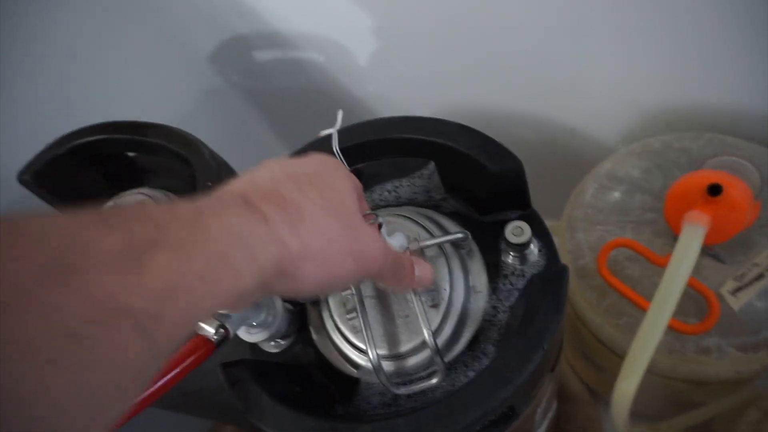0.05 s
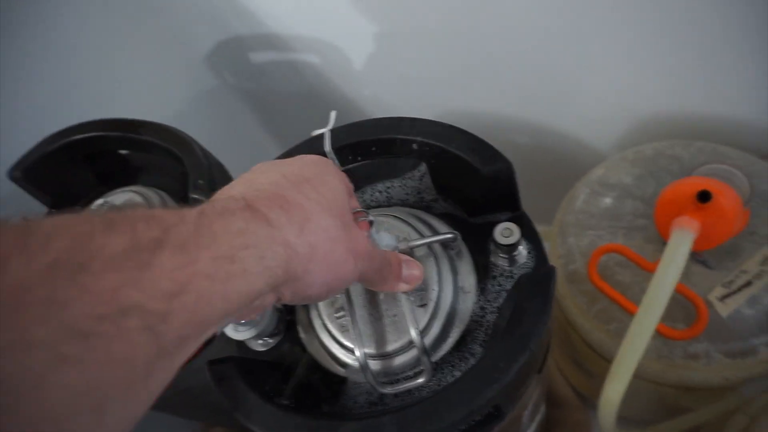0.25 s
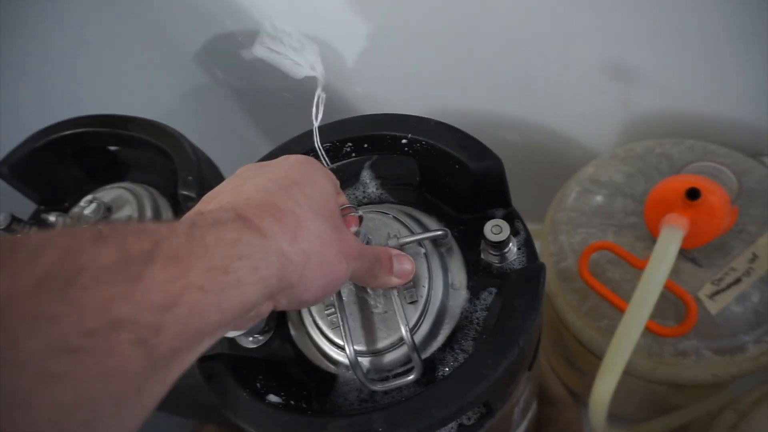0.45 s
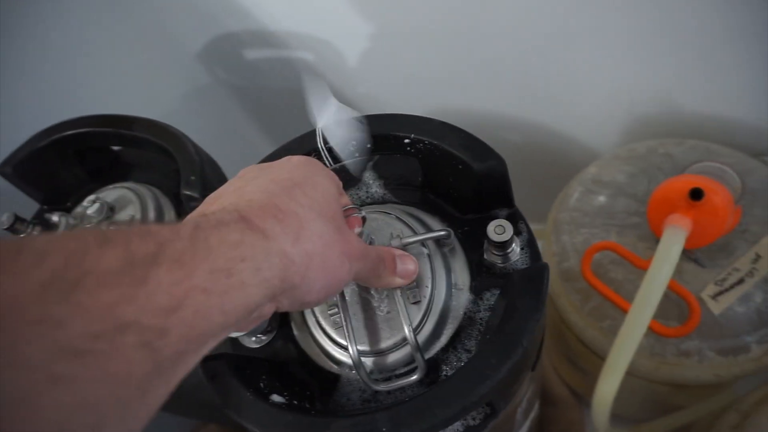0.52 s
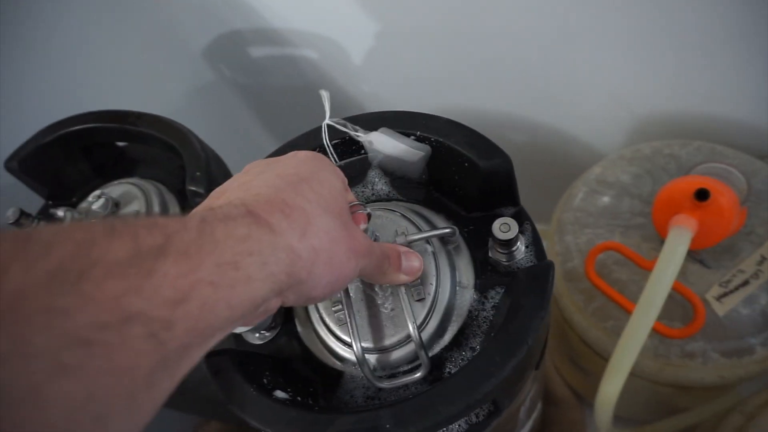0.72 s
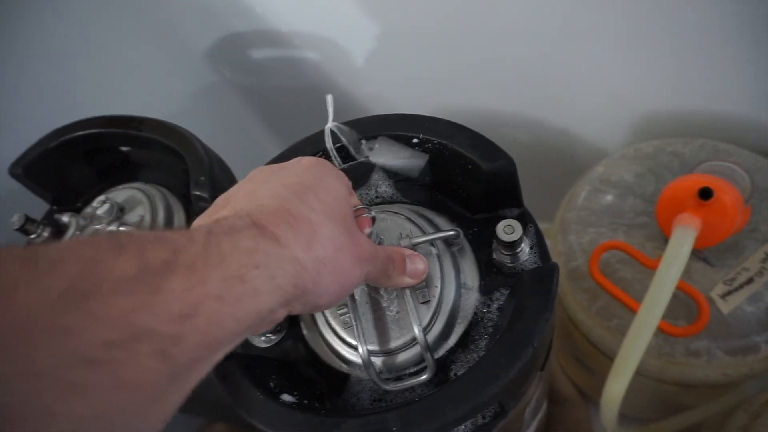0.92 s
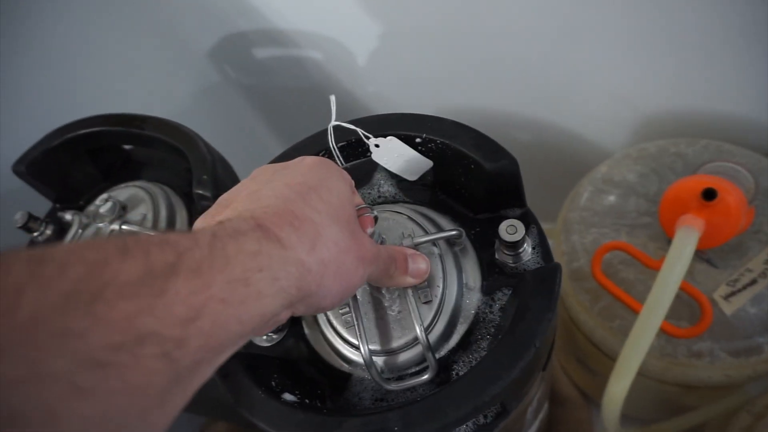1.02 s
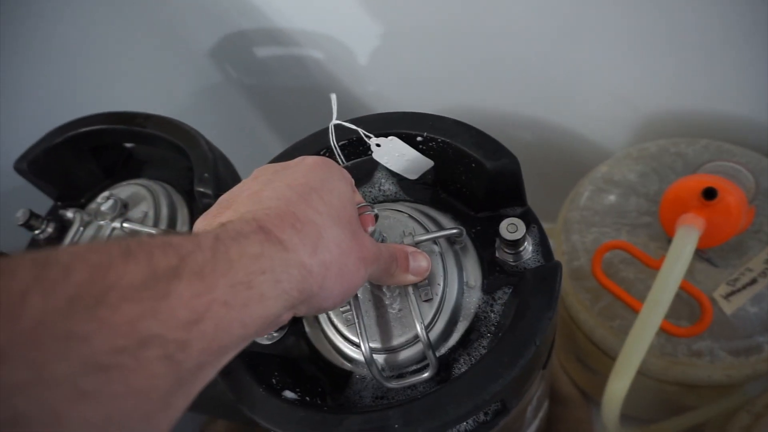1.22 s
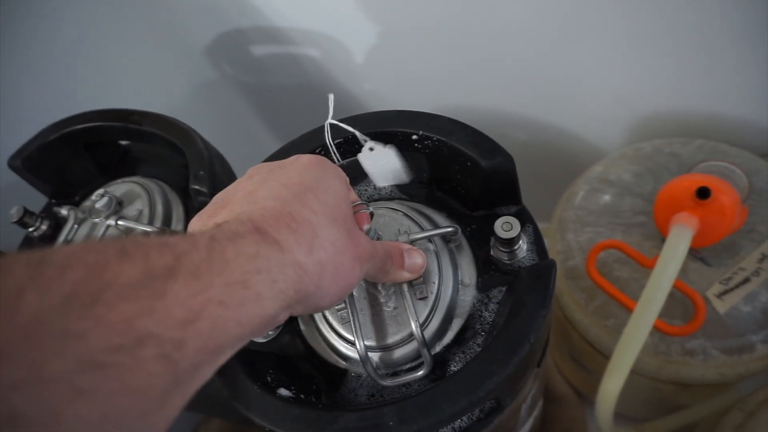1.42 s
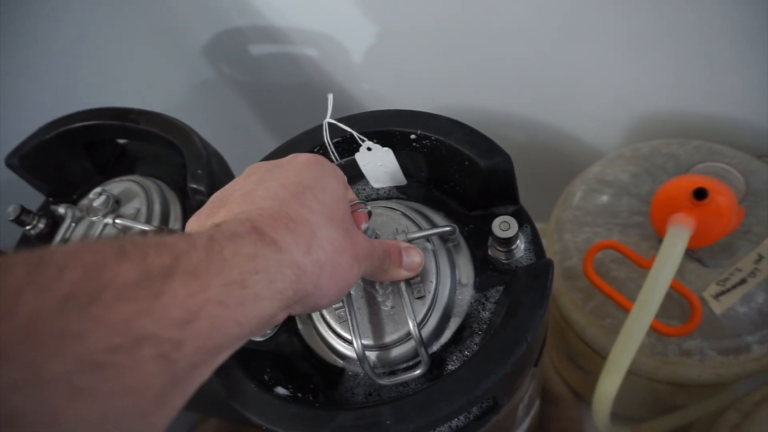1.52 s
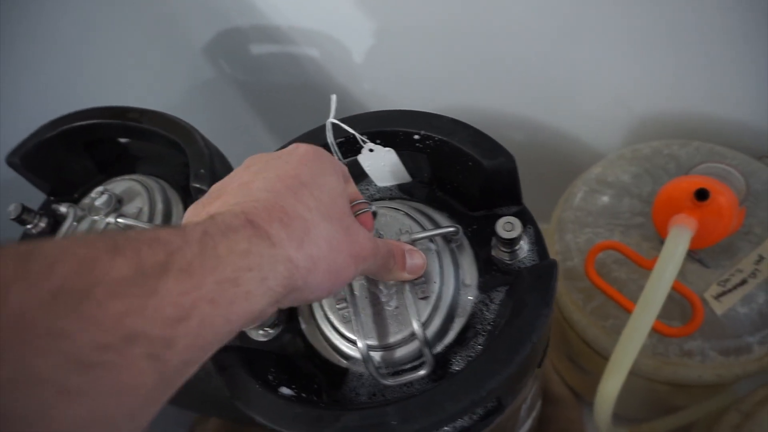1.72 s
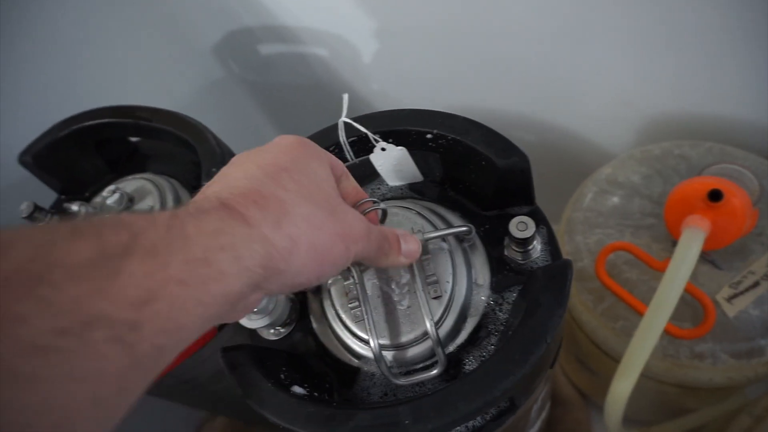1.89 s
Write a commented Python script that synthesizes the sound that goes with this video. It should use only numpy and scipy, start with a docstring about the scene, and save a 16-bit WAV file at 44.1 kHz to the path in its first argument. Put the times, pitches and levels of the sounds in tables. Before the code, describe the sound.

Gas hisses loudly from a steel keg's valve, which snaps shut with a hollow knock.

```python
"""The relief valve on a steel keg's lid is pulled open, close up in a small room.
It ticks, and gas spits as the seal breaks. A thin hiss fills out and grows to a roar as the
valve lifts, ringing in the hollow of the keg's rim. The valve snaps back with a hollow knock
that rings the keg. A weak leak hisses on, and over it the slack pull ring scrapes and clinks."""
import sys
import numpy as np
from scipy import signal
from scipy.fft import rfft, irfft, next_fast_len
from scipy.io import wavfile
from scipy.ndimage import map_coordinates

SR = 44100
rng = np.random.default_rng(int(sys.argv[2]) if len(sys.argv) > 2 else 0)


def dump_mix(stems):
    """Bounce the given channels to the path in sys.argv[1] as a 16-bit WAV at rate SR."""
    frames = np.atleast_2d(stems).T  # one column per channel
    limited = np.clip(frames, -1, 1)  # hard clip at full scale
    pcm = np.round(limited * 32767).astype(np.int16)
    wavfile.write(sys.argv[1], SR, pcm)


N = 85995

# Stereo width of the noise: f/Hz, left-right correlation
CORRELATION = [(60, 1), (300, 0.91), (700, 0.79), (1100, 0.78), (2000, 0.53), (2700, 0.18), (4000, 0.65),
               (5500, 0.3), (7000, 0.44), (8800, 0.057), (9600, 0.57), (11000, 0.47)]
# Stereo lean of the noise: f/Hz, left minus right/dB
BALANCE = [(300, 1.5), (680, -0.5), (1020, 0), (1530, -5), (2000, 0.5), (2700, -4.5), (3350, -5),
           (3900, -3), (4400, 2.5), (5200, 0.5), (6200, 0), (7500, 1), (8500, -0.5), (9400, -3.5),
           (10600, 2)]
# Colour of the room tone: f/Hz, level/dB
ROOM_TONE_EQ = [(25, -36), (58, -15), (131, -17), (208, -1.5), (254, -21), (300, -8.5), (391, -15),
                (550, -12.5), (800, -19), (3000, -27), (11000, -33.5)]
# Decay of the room's tail: f/Hz, T60/s
ROOM_DECAY = [(100, 0.2), (700, 0.61), (3000, 0.58), (6000, 0.24), (11000, 0.3)]

# Fade of the leak: t/s, level/dB
LEAK_FADE = [(1.61, -39.5), (1.72, -44.5), (1.78, -45), (1.83, -47), (1.88, -46.5), (1.92, -47),
             (1.95, -48)]
# Colour of the leak: f/Hz, level/dB
LEAK_EQ = [(100, -29), (300, -23), (450, -32), (700, -13.5), (1000, -19), (1500, -14), (2500, -15),
           (4200, -14), (4900, -19), (6000, -11.5), (7300, -19), (8200, -14.5), (9200, -17), (10200, -10.5),
           (11000, -18.5)]
# Resonances the leak excites: f/Hz, width/Hz, level/dB, left minus right/dB
LEAK_PEAKS = [(672, 33, 1.5, 3), (1002, 105, 3, 2), (2540, 140, -2.5, -9), (8130, 140, -5, 2),
              (10600, 200, -9.5, -17)]
# Resonances of the sliding pull ring: f/Hz, width/Hz, level/dB, left minus right/dB
SCRAPE_PEAKS = [(1330, 150, -9, -2), (2030, 410, -5, -3), (2848, 130, -2, -4), (3160, 200, -9, 8)]
# Modes of the pull ring touching the lid: f/Hz, level/dB, T60/s
CLINK_MODES = [(1770, -4, 0.063), (2520, -2.5, 0.21), (3060, -6, 0.2)]

# Spits as the seal breaks: t/s, length/s, level/dB, T60/s
SEAL_SPITS = [(0.2249, 0.026, -22.5, 0.28), (0.27, 0.011, -27, 0.19)]
# Colour of gas through the barely open seat: f/Hz, level/dB
SPIT_EQ = [(300, -32), (900, -18), (1400, -6.5), (2000, -25), (2450, -1), (3300, 2.5), (4100, -0.5),
           (4500, -9), (5200, -3.5), (7000, -4), (11000, -41)]

# Hits of the valve: t/s, thump/dB, knock/dB, ring/dB, click/dB
VALVE_HITS = [(0.1935, -47.5, -52, -78, -88), (0.2175, -62, -62, -75, -44), (0.2255, -51, -51, -74, -22.5),
              (1.6038, -12.5, -21, -34, -20.5), (1.6091, -27, -28, -43, -18), (1.618, -40, -30.5, -54, -29)]
# Colour of the dull knock: f/Hz, level/dB
KNOCK_EQ = [(30, -34), (55, -22), (75, -8), (130, -33), (220, -10.5), (290, -35), (400, -9.5), (540, -0.5),
            (740, 4.5), (900, -7), (1250, -6), (1600, -17), (3000, -21), (9000, -52)]
# Colour of the bright click: f/Hz, level/dB
CLICK_EQ = [(400, -14.5), (1200, 3.5), (1600, -2.5), (2100, 6.5), (2700, 1), (3500, 6), (4400, -4),
            (5300, -2), (7000, -18), (11000, -3.5)]
# Modes of the steel keg: f/Hz, level/dB, T60/s
KEG_MODES = [(80, -17.5, 0.39), (336, -4, 0.11), (652, -7, 0.26), (990, 0, 0.33), (2147, -3, 0.24),
             (2410, 3, 0.045), (3485, 9.5, 0.07), (5170, -1, 0.1)]
# Rough booms of the keg's hollow after the valve shuts: t/s, level/dB
BOOM_HITS = [(1.606, -32.5), (1.676, -43)]
# Resonances of that boom: f/Hz, width/Hz, level/dB, left minus right/dB
BOOM_PEAKS = [(600, 91, -1, 0), (650, 45, 0, -1), (820, 100, -4, 3), (930, 110, -6, -2)]

# Valve lift as a fader ride, taken relative to its mean: t/s, level/dB
LIFT_RIDE = [(0.23, -32.5), (0.33, -33), (0.46, -29.5), (0.6, -26.5), (0.72, -25.5), (0.8, -23.5),
             (0.89, -22), (0.998, -22.5), (1.1, -22.5), (1.17, -23.5), (1.28, -22), (1.34, -23.5),
             (1.43, -22.5), (1.48, -24.5), (1.56, -22), (1.6, -22)]
# Colour of the jet's fine fizz: f/Hz, level/dB
FIZZ_EQ = [(50, -43), (530, -27), (900, -44), (1250, -36), (1410, -12.5), (1720, -13.5), (1950, -10),
           (3160, -8), (4020, -3.5), (4610, -12.5), (5750, -3), (8740, -4.5), (10200, 2), (11000, -0.5),
           (14300, -60), (22000, -120)]
# Colour of the jet's bright roar: f/Hz, level/dB
ROAR_EQ = [(60, -52), (350, -25), (1000, -26), (2000, -8), (2800, -15), (3400, -5), (3800, -1),
           (4600, -1.5), (5100, 3.5), (5900, 1.5), (6500, -15), (8000, -30), (11000, -15)]
# Colour of the jet's low rush: f/Hz, level/dB
RUSH_EQ = [(25, -42), (50, -40), (80, -19), (170, -19), (215, -10.5), (270, -16.5), (345, -6.5),
           (430, -9.5), (600, -7), (760, -1.5), (880, -2), (1050, 0.5), (1270, 3.5), (1450, -6),
           (2500, -16.5)]
# Colour of the keg's murmur under the flow: f/Hz, level/dB
MURMUR_EQ = [(30, -30), (75, -6), (130, 3), (250, -4.5), (345, 5.5), (440, -5), (800, -20.5)]
# Resonances of the lid and rim: f/Hz, width/Hz, level/dB, left minus right/dB
RIM_PEAKS = [(353, 16, -14.5, -8), (1106, 166, -7, 10.5), (1240, 84, -7, -10), (3543, 66, 0.5, 3),
             (4080, 140, 2, -7), (4347, 96, 3.5, -6), (4864, 91, 6.5, 2), (4920, 64, 4, -5),
             (5210, 31, 2, 14), (5030, 55, 0.5, 18), (5180, 35, -3, -2), (5760, 120, -5, -2),
             (5660, 91, -1, -8), (5840, 59, -11, 4), (5830, 110, 0, 13.5), (6620, 170, -2.5, 8.5),
             (7570, 88, -8, 16), (9600, 96, -19, 3), (10200, 74, -5, 4), (10330, 33, 3, -3),
             (10640, 44, 5, 4)]

OPEN_S, SHUT_S = 0.222, 1.604
CLOSE_S = 0.0089  # time constant of the flow's fall
SWAY_DB, FLUTTER_DB = 0.37, 0.67  # slow and fast wavering of the gas


def amp(db):
    """Decibels to gain."""
    return 10 ** (np.asarray(db) / 20)


def unit(x):
    """Scale to rms 1."""
    return x / np.sqrt(np.mean(x ** 2) + 1e-20)


def along(points, hz):
    """Read a curve of (f/Hz, value) points on a log frequency axis."""
    f, values = np.transpose(points)
    return np.interp(np.log(hz + 1), np.log(f + 1), values)


def wobble(rate):
    """A smooth random curve with `rate` knots a second."""
    knots = rng.standard_normal(int(N * rate / SR) + 4)
    return map_coordinates(knots, [np.arange(N) * rate / SR])


def filtered(x, response):
    """Equalise x with a gain that is a function of frequency."""
    size = next_fast_len(N + SR // 2)
    return irfft(rfft(x, size) * response(np.fft.rfftfreq(size, 1 / SR)), size)[..., :N]


def pan(db):
    """Left and right gains for a level difference."""
    return amp(np.array([[.5], [-.5]]) * db)


def stereo_white():
    """White noise, centred in the bass and wider in the treble."""
    def mid_side_gains(hz):
        angle = np.arccos(np.clip(along(CORRELATION, hz), -1, 1)) / 2
        return np.array([np.cos(angle), np.sin(angle)])
    mid, side = filtered(rng.standard_normal((2, N)), mid_side_gains)
    return np.array([mid + side, mid - side])


def noise(eq):
    """Coloured stereo noise of rms 1."""
    return unit(filtered(stereo_white(), lambda hz: amp(along(eq, hz)) * pan(along(BALANCE, hz))))


def resonant(peaks):
    """Stereo noise of rms 1 ringing in steady resonances."""
    def response(hz):
        power = 0
        for centre, width, db, lean_db in peaks:
            bell = (hz * width) ** 2 / ((centre ** 2 - hz ** 2) ** 2 / 2 + (hz * width) ** 2)
            power += (amp(db) * pan(lean_db) * bell) ** 2
        return np.sqrt(power)
    return unit(filtered(stereo_white(), response))


def burst(t, start, t60, attack_s=0.001):
    """A sharp attack and an exponential decay."""
    age = np.maximum(t - start, 0)
    return np.minimum(age / attack_s, 1) * np.exp(-np.log(1000) * age / t60)


def ringing(t, start, modes):
    """Struck steel: each mode fades at its own speed."""
    return sum(amp(db + rng.normal(0, 1)) * burst(t, start, t60) * np.sin(2 * np.pi * hz * (t - start))
               for hz, db, t60 in modes)


def room_tone():
    """A faint, low bed of steady noise."""
    return amp(-58.5) * noise(ROOM_TONE_EQ)


def room(x, tail_db=-15, walls_db=-11.5, widen_hz=2320):
    """Near walls answer at once; the room's tail hangs longest in the mids."""
    bands, times, spectra = signal.stft(rng.standard_normal((2, SR // 2)), SR, nperseg=256)
    decay = np.exp(-np.log(1000) * times / along(ROOM_DECAY, bands)[:, None])
    tail = signal.istft(spectra * decay, SR, nperseg=256)[1]
    walls = rng.standard_normal(tail.shape) * burst(np.arange(tail.shape[1]) / SR, 0.001, t60=0.07)
    echo = amp(tail_db) * tail / np.linalg.norm(tail[0])
    echo += amp(walls_db) * walls / np.linalg.norm(walls[0])
    wet = signal.fftconvolve(x, echo, axes=1)[:, :N]
    spread = lambda hz: np.pi / 4 * hz / (hz + widen_hz)  # echoes widen toward the treble
    mid = filtered(wet[0], lambda hz: np.cos(spread(hz)))
    side = filtered(wet[1], lambda hz: np.sin(spread(hz)))
    return np.array([mid + side, mid - side])


def leak(t):
    """Gas seeps past the closed seat: a soft hiss with a hollow ring."""
    seep = noise(LEAK_EQ) + amp(-6) * resonant(LEAK_PEAKS)
    level_db = np.interp(t, *np.transpose(LEAK_FADE)) + SWAY_DB * wobble(25.8)
    return (t > SHUT_S) * amp(level_db) * seep


def pull_ring(t, clink_s=1.747, scrape_s=1.748, rise_s=0.02, t60=0.19):
    """The slack pull ring slides briefly on the valve and clinks on the lid."""
    age = t - scrape_s
    swell = np.exp(np.minimum(age, 0) / rise_s - np.log(1000) * np.maximum(age, 0) / t60)
    scrape = amp(-44.5) * swell * resonant(SCRAPE_PEAKS)
    clink = amp(-44) * ringing(t, clink_s, CLINK_MODES)
    return scrape + clink


def spit(t):
    """Short, choked hisses escape as the seal breaks."""
    flow = np.zeros(N)
    for start, length, db, t60 in SEAL_SPITS:
        release = np.exp(-np.maximum(t - start - length, 0) / CLOSE_S)
        flow += amp(db) * burst(t, start, t60) * release
    return flow * noise(SPIT_EQ)


def valve(t, lid_hz=738):
    """Each hit layers the lid's thump, a knock, a click and ringing steel; shutting booms the keg."""
    knock, click = noise(KNOCK_EQ), noise(CLICK_EQ)
    hits = np.zeros((2, N))
    for start, thump_db, knock_db, ring_db, click_db in VALVE_HITS:
        hits += amp(thump_db) * burst(t, start, t60=0.027) * np.sin(2 * np.pi * lid_hz * (t - start))
        hits += amp(knock_db) * burst(t, start, t60=0.053) * knock
        hits += amp(click_db) * burst(t, start, t60=0.043) * click
        hits += amp(ring_db) * ringing(t, start, KEG_MODES)
    boom = sum(amp(db) * burst(t, start, t60=0.17) for start, db in BOOM_HITS)
    return hits + boom * resonant(BOOM_PEAKS)


def valve_gap(t, flow, attack_s=0.012, widen_s=0.29, widen_rise_s=0.012, thin_hz=2460, thin_db=-8.5):
    """The gap gates the jet: thin at first, full once it widens, cut off when it shuts."""
    lows = filtered(flow, lambda hz: 1 / (1 + (hz / thin_hz) ** 10))
    highs = flow - lows
    narrow = (1 - np.tanh((t - widen_s) / widen_rise_s)) / 2
    attack = np.clip((t - OPEN_S) / attack_s, 0, 1) ** 2
    release = np.exp(-np.maximum(t - SHUT_S, 0) / CLOSE_S)
    return attack * release * (highs + amp(thin_db * narrow) * lows)


def jet(t, choke_db=7, choke_s=0.13):
    """Turbulent gas: lift rides fizz, roar, rim and rush, each at its own slope, over a steady murmur."""
    times, ride_db = np.transpose(LIFT_RIDE)
    lift_db = np.interp(t, times, ride_db) - ride_db.mean() + SWAY_DB * wobble(13.94)
    fizz = amp(-23 + 0.24 * lift_db + FLUTTER_DB * wobble(60.45)) * noise(FIZZ_EQ)
    roar = amp(-26.5 + 1.64 * lift_db + FLUTTER_DB * wobble(59.6)) * noise(ROAR_EQ)
    rim = amp(-28.5 + 1.12 * lift_db) * resonant(RIM_PEAKS)
    # The low rush swells as the gap narrows before it shuts.
    swell_db = choke_db * np.exp(-np.abs(SHUT_S - t) / choke_s)
    rush = amp(-36 + 1.14 * lift_db + swell_db + FLUTTER_DB * wobble(30.5)) * noise(RUSH_EQ)
    murmur = amp(-54.5) * noise(MURMUR_EQ)
    return valve_gap(t, fizz + roar + rim + rush + murmur)


def scene():
    """The keg up front, with its reverb and the room tone behind."""
    t = np.arange(N) / SR
    keg = jet(t) + spit(t) + valve(t) + leak(t) + pull_ring(t)
    return keg + room(keg) + room_tone()


def record(dry):
    """A low cut thins the deep bass and a steep high cut takes off the air."""
    low_cut_hz, high_cut_hz = 45, 11020
    thinned = signal.sosfilt(signal.butter(3, low_cut_hz, btype="high", fs=SR, output="sos"), dry)
    return filtered(thinned, lambda hz: 1 / np.sqrt(1 + np.minimum(hz / high_cut_hz, 1.1) ** 2000))


dry = scene()
out = record(dry)
dump_mix(out)
```